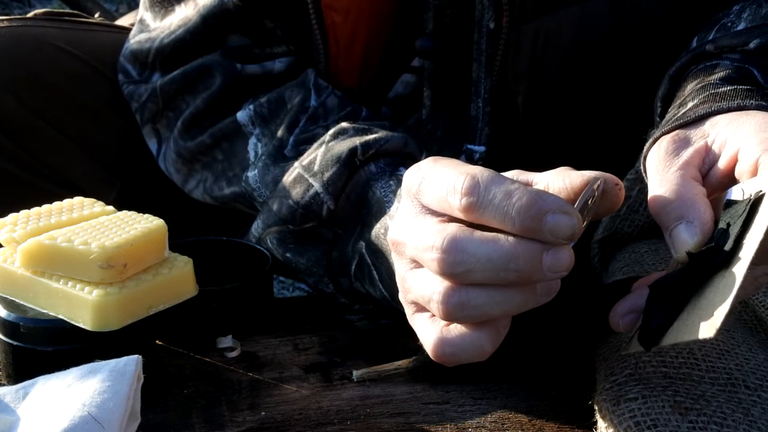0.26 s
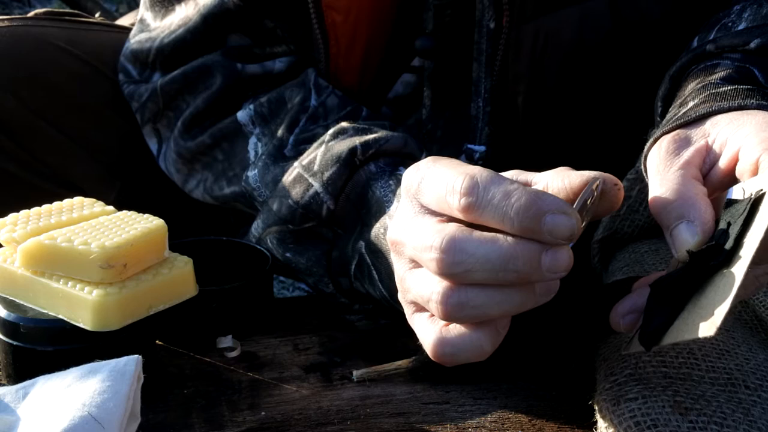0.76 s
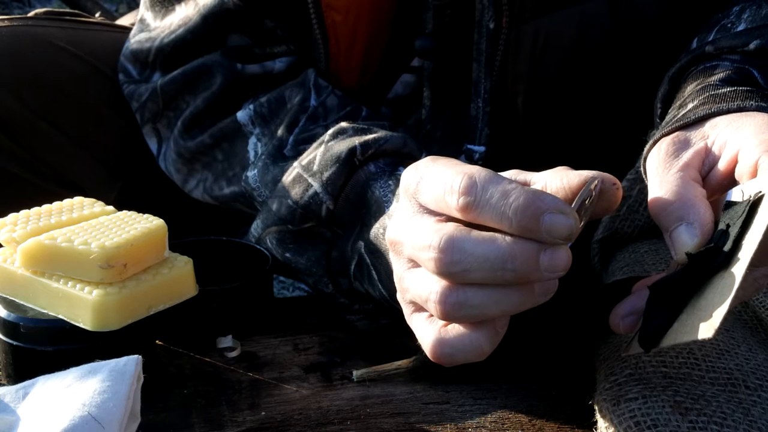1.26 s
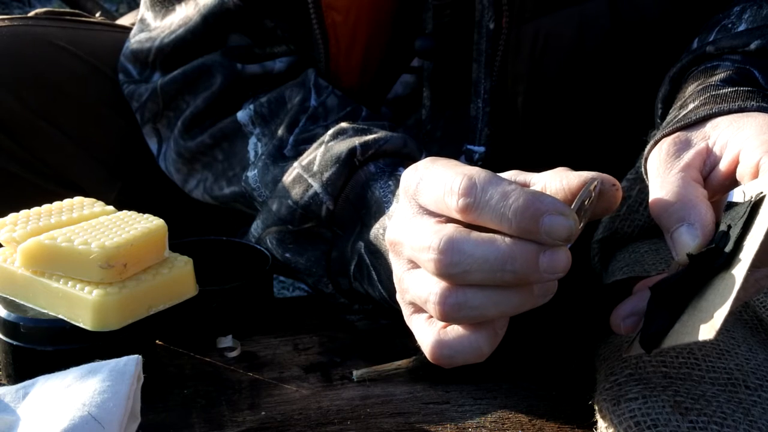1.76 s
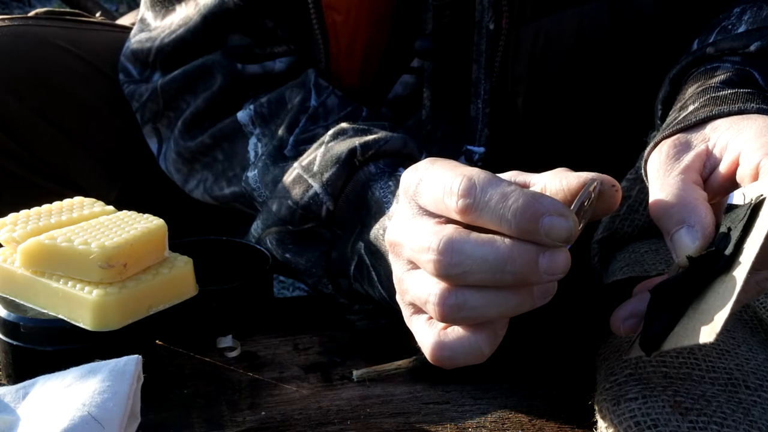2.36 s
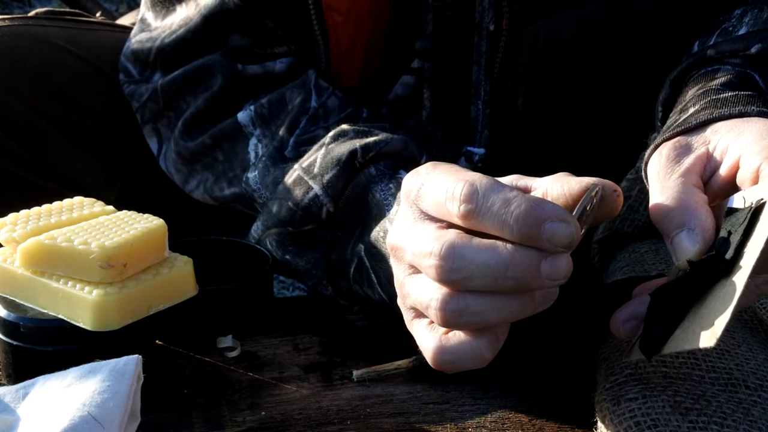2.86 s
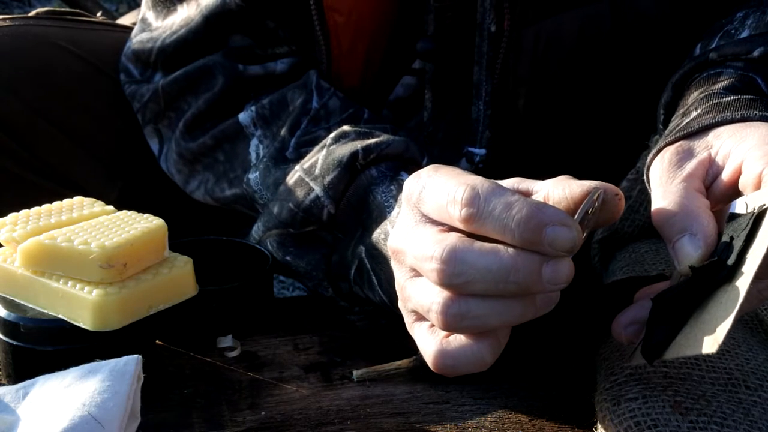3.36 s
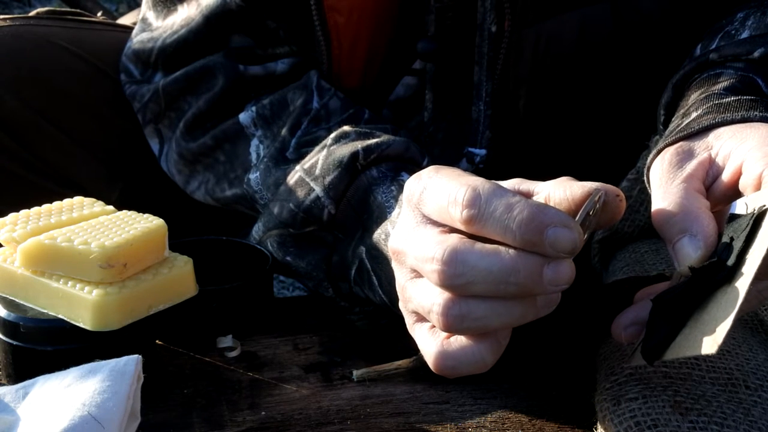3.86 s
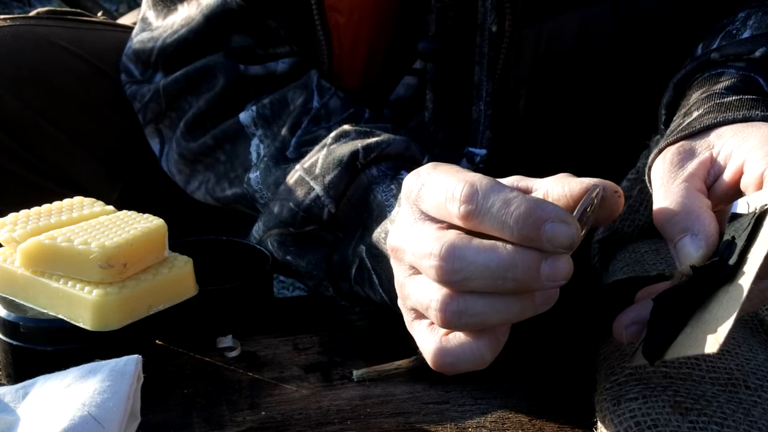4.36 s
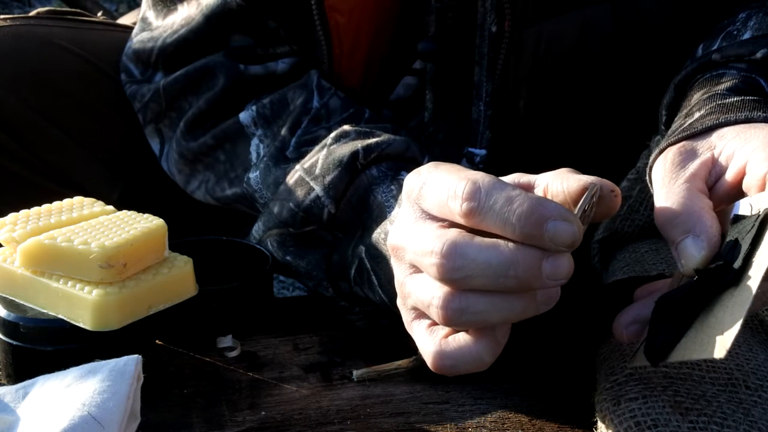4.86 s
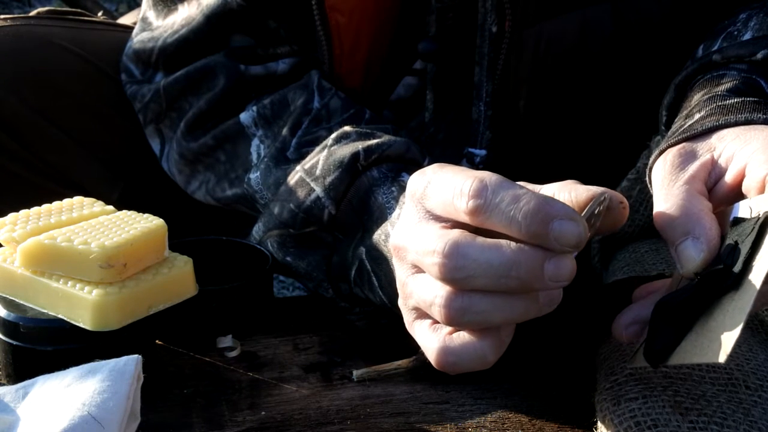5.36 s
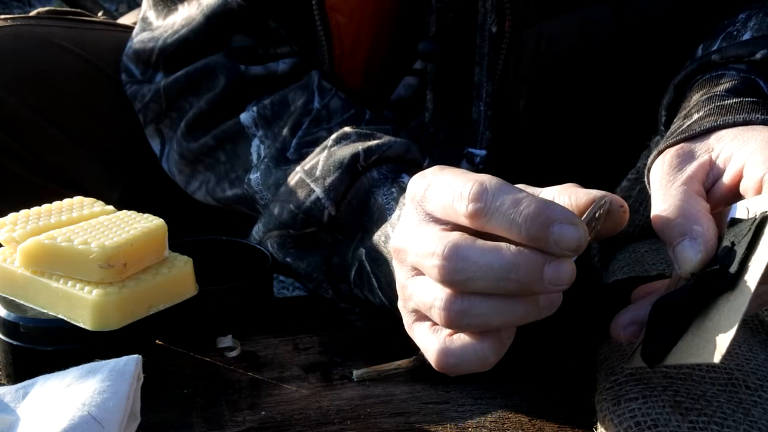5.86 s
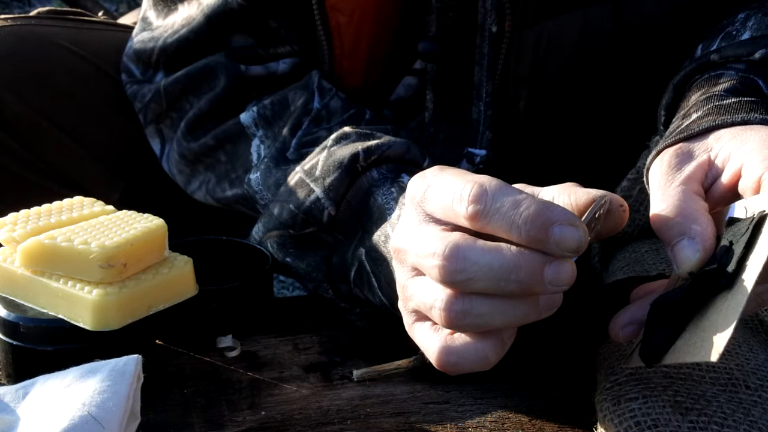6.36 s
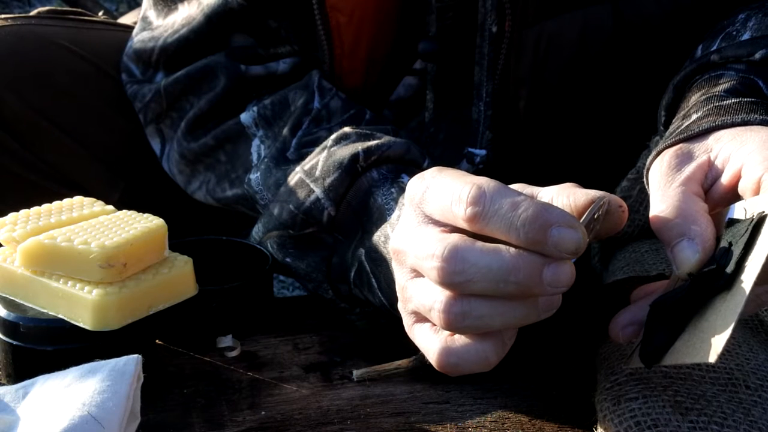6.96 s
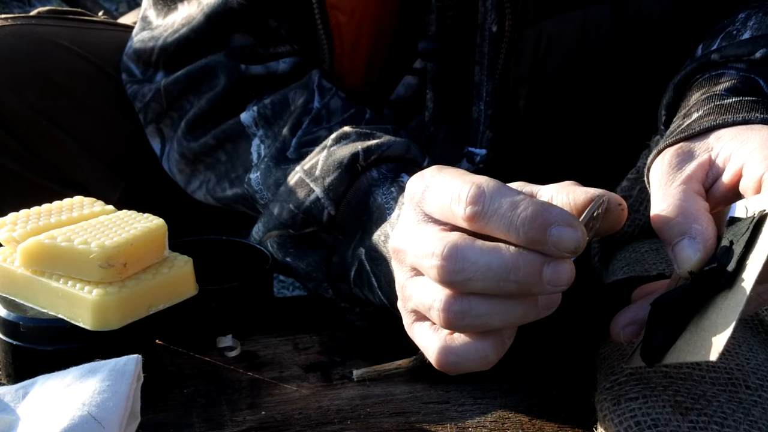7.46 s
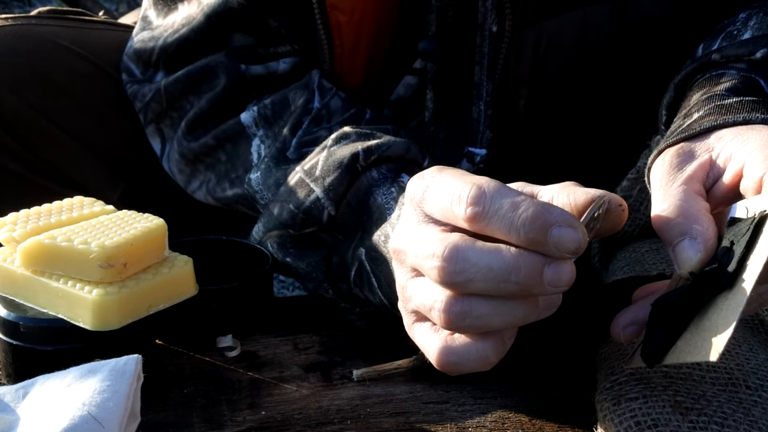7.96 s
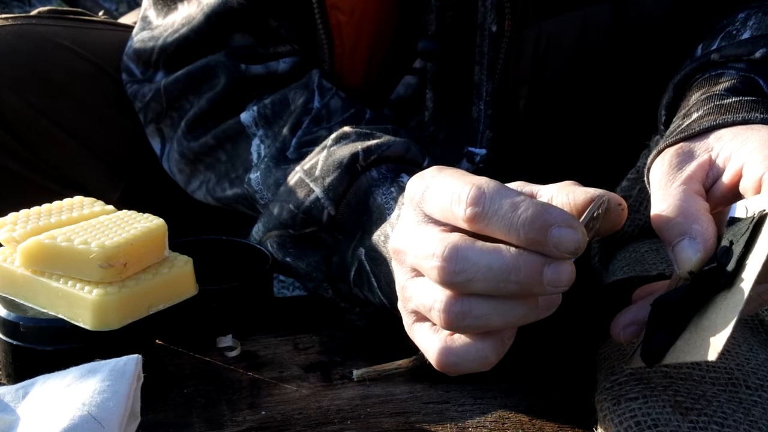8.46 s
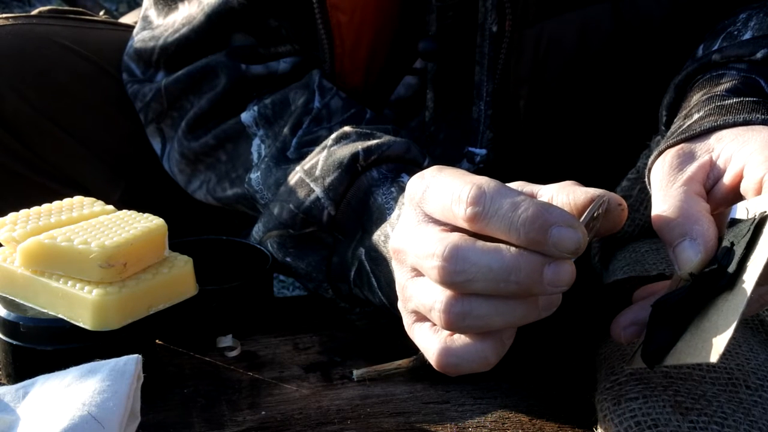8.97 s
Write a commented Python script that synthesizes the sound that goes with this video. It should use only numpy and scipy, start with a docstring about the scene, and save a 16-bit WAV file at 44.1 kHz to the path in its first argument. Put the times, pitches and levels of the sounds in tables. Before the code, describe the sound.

Loud, irregular wood cracks and two dull pops against a soft hiss and far road drone; a bird chirps thinly near the end.

```python
"""A wood fire burns low outdoors, close to a stereo recorder, over hissing embers and the roar and hum of a far road.
From the start its filtered bursts snap as cracks and ticks, each with decaying noise scattered back around it.
The loudest clip, and a gain control that starts low ducks everything after peaks, then slowly recovers.
Faint swept-sine whistles join midway; then two damped sines give dull pops amid the traffic's swells.
Near the end a bird adds an even run of soft, falling chirps."""
import sys
import numpy as np
from scipy import signal
from scipy.fft import rfft, irfft, next_fast_len
from scipy.io import wavfile
from scipy.ndimage import uniform_filter1d

SR = 44100
rng = np.random.default_rng(int(sys.argv[2]) if len(sys.argv) > 2 else 0)


def to_wav(sig):
    """Store sig (one row per channel, or 1-D mono) as 16-bit WAV at the path in sys.argv[1].

    Samples outside -1..1 are clipped; the rate is SR.
    """
    pcm = np.clip(np.atleast_2d(sig), -1, 1) * 32767
    pcm = np.round(pcm).astype(np.int16)
    wavfile.write(sys.argv[1], SR, pcm.T)  # frames by channels


N = 406161
T = np.arange(N) / SR  # time [s]

SCATTER_DB = -5.5  # scatter setting for a crack of 0 dB and 0 dB top
SCATTER_DB_PER_DB = 0.13  # weaker cracks lie deeper in the pile, so more of them arrives scattered
SCATTER_PER_TOP_DB = 0.25  # thin splinters throw more of their sound in all directions
# Cracks of the burning wood. Each row: start in seconds [s], level of the snap in dB [dB],
# depth as knock over snap in dB [dB], top as treble tilt in dB per octave about 7 kHz [dB/octave].
WOOD_CRACKS = [(.3482, -33.5, -3, 2), (1.201, -2, -9.5, -0.5), (1.3587, -21.5, -6, 1),
               (1.5763, -41.5, -22, 4), (1.6597, -31, -13, -3), (1.7379, -5, -18, -3),
               (1.7415, -13, -15, 0), (2.547, -31, -4, -3), (2.863, -38, -20, -2), (2.8906, -9, -12, 2.5),
               (3.5412, -35.5, -7, -3), (4.024, -38, -15, -2), (4.313, -31, -25, -3), (4.5315, -42, -22, 0),
               (4.5575, -40.5, 1, -2), (5.5114, -36.5, -14, 5), (5.765, -36.5, 3, -2),
               (5.833, -2.5, -20, 3), (5.839, -18, -23, 9), (6.2027, -44, -8, -2), (6.3872, -26, -7, -6),
               (6.3894, -22, 5, -10), (6.898, -9, -1, -12.5), (7.8227, -34.5, 4, 2),
               (7.9891, -41.5, -4, -6), (8.4204, -34, -5, 4), (8.5034, -38.5, 12, -17),
               (8.5823, -32.5, 4, -2), (8.904, -29.5, -11, -8), (9.053, -44, -12, -8)]


def cracks():
    """Direct and scattered sound: a direct burst at each microphone, then a diffuse decaying tail."""
    direct, scattered = np.zeros((2, N)), np.zeros((2, N))
    short_t, echo_t = T[:SR // 40], T[:SR // 4]
    for start_s, db, depth_db, top_db in WOOD_CRACKS:
        push = fracture(short_t, tear_s=0.00046, tearing=0.89, evenness=0.27)
        scatter_db = SCATTER_DB - SCATTER_DB_PER_DB * db + SCATTER_PER_TOP_DB * top_db
        impulse = signal.unit_impulse(len(short_t))
        all_round = wood(impulse, db, depth_db, top_db) * undb(scatter_db)
        for channel in range(2):
            add(direct[channel], start_s, wood(push[channel], db, depth_db, top_db))
            echo = surroundings(echo_t, near_s=0.0028, near_db=10.0, far_t60_s=0.21, dulling_s=0.069)
            add(scattered[channel], start_s, signal.fftconvolve(all_round, echo))
    return at_microphones(direct) + scattered


def fracture(t, tear_s, tearing, evenness):
    """Impulsive excitation: one sudden break, then fibres tearing as decaying noise."""
    shared = rng.standard_normal(len(t))
    # each microphone catches the finest splinters differently; differencing favours the treble
    own = np.diff(rng.standard_normal((2, len(t) + 1)))
    fibres = (shared + 0.21 * own) * np.exp(-t / tear_s)
    push = tearing * fibres / np.linalg.norm(fibres[0])
    push[:, 0] += 1
    # evenness 0 leaves the spectrum as it is, 1 makes it flat
    spectrum = rfft(push)
    flatter = irfft(spectrum / np.abs(spectrum) ** evenness, len(t))
    return flatter * np.exp(-t / 0.006)


BODY_SHARE = 0.41  # the woody body follows this share of a crack's depth
BODY_DB = -2.0  # body over snap in a crack of no depth
# Spectra of the three parts of a crack. Each row: frequency in hertz [Hz], gain in dB [dB].
KNOCK_SPECTRUM = [(150, -14), (400, -4), (750, -3.5), (1100, 3), (1450, -3), (1900, -25), (2800, -32.5),
                  (4500, -56)]
BODY_SPECTRUM = [(700, -36.5), (1400, -33.5), (1900, -6), (2400, 2.5), (2800, -0.5), (3300, 6), (4200, -16),
                 (6000, -37)]
SNAP_SPECTRUM = [(2500, -37.5), (4600, -14), (6200, 1), (7500, 4.5), (9300, 4.5), (11000, 0.5), (12500, -4),
                 (14500, -24), (16500, -17)]


def wood(push, db, depth_db, top_db):
    """Source-filter response: wood answers a push with a knock, a hollow body and a bright snap."""
    # thick pieces are deeper, thin splinters have more top
    snap_spectrum = []
    for hz, level_db in SNAP_SPECTRUM:
        octaves = np.clip(np.log2(hz / 7000), -0.5, 1.5)
        snap_spectrum.append((hz, level_db + top_db * octaves))
    knock = burst(colour(push, KNOCK_SPECTRUM), db + depth_db)
    body = burst(colour(push, BODY_SPECTRUM), db + BODY_DB + BODY_SHARE * depth_db)
    snap = burst(colour(push, snap_spectrum), db)
    return knock + body + snap


# Colour of what the surroundings throw back. Each row: frequency in hertz [Hz], gain in dB [dB].
SCATTER_SPECTRUM = [(200, -9), (1000, -4.5), (2300, -1.5), (3200, -4.5), (4500, 8), (6200, -4), (8000, -5),
                    (11000, 1.5), (15000, 11)]


def surroundings(t, near_s, near_db, far_t60_s, dulling_s):
    """Diffuse reflection and air absorption: clutter from logs and ground, then ever duller returns."""
    near = undb(near_db) * np.exp(-t / near_s)
    far = np.exp(-np.log(1000) * t / far_t60_s)
    # returns come in uneven clumps
    grain_db = 1.3 * rng.standard_normal(len(t))
    clump_db = 4.5 * np.repeat(rng.standard_normal(len(t)), SR // 600)[:len(t)]
    returns = rng.standard_normal(len(t)) * undb(grain_db + clump_db)
    dull = signal.sosfilt(signal.butter(2, 11000, fs=SR, output="sos"), returns)
    # the roll keeps bright and dull returns independent while one fades into the other
    fresh = np.exp(-t / dulling_s)
    bright = np.roll(returns, len(t) // 2)
    blend = np.sqrt(fresh) * bright + np.sqrt(1 - fresh) * dull
    echo = blend * (near + far) * np.minimum(t / 0.00028, 1)
    return colour(echo / np.linalg.norm(echo), SCATTER_SPECTRUM)


MICROPHONE_LAG_S = 0.00003  # direct crack sound reaches the right microphone this much later


def at_microphones(pair):
    """Interaural-style time difference: a linear phase shift delays the right channel."""
    size = pair.shape[1]
    lag = np.exp(-2j * np.pi * np.fft.rfftfreq(size, 1 / SR) * MICROPHONE_LAG_S)
    return np.array([pair[0], irfft(rfft(pair[1]) * lag, size)])


# Dull pops of gas. Each row: start in seconds [s], level in dB [dB], ring in hertz [Hz],
# decay time in seconds [s].
GAS_POPS = [(6.3906, -12, 203, 0.0018), (6.8982, -20, 260, .002)]


def pops():
    """Damped oscillation: a pocket of gas lets go with one heavily damped low swing."""
    out, t = np.zeros((2, N)), T[:SR // 16]
    for start_s, db, hz, decay_s in GAS_POPS:
        swing = np.sin(2 * np.pi * hz * t) * np.exp(-t / decay_s)
        add(out, start_s, burst(swing, db))
    return out


# Spectrum of the glowing wood. Each row: frequency in hertz [Hz], density in dB per hertz [dB/Hz].
HISS_SPECTRUM = [(500, -3), (2000, 5.5), (3300, 0.5), (4500, 0), (6500, -2), (8500, -4), (11000, -7.5),
                 (13500, -12.5), (16000, -20)]


def embers(hiss_db, flicker_db, ticks_per_s, tick_db):
    """Broadband noise and a random impulse train: a soft flickering hiss with tiny ticks."""
    hiss = air(HISS_SPECTRUM, apart=1.0) * undb(hiss_db + flicker_db * walk(9.2))
    struck = rng.random(N) < ticks_per_s / SR
    ticks = struck * undb(tick_db + rng.uniform(-11, 0, N))
    return hiss + colour(ticks, SNAP_SPECTRUM)


ROAR_RISE_DB_PER_S = 0.13  # the traffic slowly grows
PASS_DRONE_DB, PASS_WHINE_DB, WHINE_WANDER_HZ = -41, -46.5, 8  # levels for a vehicle at 0 dB
ENGINE_HZ, ENGINE_WANDER_HZ = 111, 3.645
# Steady road spectra. Each row: frequency in hertz [Hz], density in dB per hertz [dB/Hz].
TYRE_SPECTRUM = [(250, -20), (450, -9), (620, -2.5), (780, 1.5), (1000, 1), (1200, -6.5), (1500, -15),
                 (2000, -21.5), (2600, -32.5), (3500, -39), (6000, -92)]
DRONE_SPECTRUM = [(200, -5.5), (340, -4.5), (430, 4), (520, 9.5), (650, 6.5), (850, -4.5), (1400, -43)]
RUMBLE_SPECTRUM = [(20, -36), (32, -28), (45, -14), (60, 0.5), (80, 0), (130, -2.5), (170, 0.5),
                   (240, -3.5), (330, -13), (480, -18), (900, -64)]
# Vehicles passing far off. Each row: nearest time in seconds [s], spread of the swell in seconds [s],
# relative level in dB [dB], pitch of the tyre whine in hertz [Hz].
VEHICLE_PASSES = [(5.7, 1, -8, 427.2), (6.96, 0.44, 0.5, 520), (8.9, 0.96, -0.5, 528.5)]
# Hum of a far engine. Each row: time in seconds [s], level in dB [dB].
ENGINE_LEVELS = [(1.2, -40.5), (1.7, -45.5), (5.5, -50), (6, -40.5), (7.4, -41.5), (8, -43.5)]


def road(tyres_db, drone_db, rumble_db, waver_db):
    """Noise and tonal sources combined: roar, rumble and hum; passing vehicles swell drone and whine."""
    rise_db = ROAR_RISE_DB_PER_S * T
    out = air(TYRE_SPECTRUM, apart=0.18) * undb(tyres_db + rise_db + waver_db * walk(8))
    out += air(RUMBLE_SPECTRUM, apart=0.085) * undb(rumble_db + rise_db + waver_db * walk(5))
    engine_db = np.interp(T, *np.transpose(ENGINE_LEVELS))
    out += tone(ENGINE_HZ, ENGINE_WANDER_HZ) * undb(engine_db)
    drone = air(DRONE_SPECTRUM, apart=0.078) * undb(waver_db * walk(6))
    drone_gain = undb(drone_db)
    for nearest_s, spread_s, db, whine_hz in VEHICLE_PASSES:
        near = undb(db) * np.exp(-0.5 * ((T - nearest_s) / spread_s) ** 2)
        # independent noises add in power
        drone_gain = np.hypot(drone_gain, near * undb(PASS_DRONE_DB))
        out += tone(whine_hz, WHINE_WANDER_HZ) * near * undb(PASS_WHINE_DB)
    return out + drone * drone_gain


def tone(hz, wander_hz):
    """Frequency and amplitude modulation: a far sine near unit level wavers in pitch and strength."""
    phase = 2 * np.pi * np.cumsum(hz + wander_hz * walk(16)) / SR
    return np.sqrt(2) * np.sin(phase) * undb(1.5 * walk(7))


# Thin bird whistles. Each row: start in seconds [s], length in seconds [s], start pitch in hertz [Hz],
# end pitch in hertz [Hz], level in dB before flutter and echo [dB].
BIRD_WHISTLES = [(5.28, .17, 7800, 6740, -63), (5.586, .052, 5600, 4350, -60),
                 (5.955, .12, 5680, 5400, -55), (6.225, .12, 7400, 7350, -62),
                 (6.446, 0.051, 4120, 4200, -55), (8.228, .11, 4600, 4550, -63)]


def bird(waver, flutter_db, direct, echo_s):
    """Frequency glides in a diffuse field: thin, fluttering whistles smeared by their echo."""
    song = np.zeros(N)
    wobble = 1 + waver * walk(300)
    for start_s, length_s, start_hz, end_hz, db in BIRD_WHISTLES + twitter(count=4):
        u = np.linspace(0, 1, int(length_s * SR))
        note_wobble = np.roll(wobble, -int(start_s * SR))[:len(u)]
        hz = (start_hz + (end_hz - start_hz) * u) * note_wobble
        sine = np.sqrt(2) * np.sin(2 * np.pi * np.cumsum(hz) / SR)
        add(song, start_s, undb(db) * np.sin(np.pi * u) * sine)
    song *= undb(flutter_db * walk(70))
    t = T[:SR // 3]
    echo = rng.standard_normal((2, len(t))) * np.exp(-t / echo_s)
    echoed = signal.fftconvolve(song[None], echo / np.linalg.norm(echo))[:, :N]
    return direct * song + echoed


TWITTER_START_S, TWITTER_EVERY_S, CHIRP_S = 8.46, 0.15, 0.093
CHIRP_HZ, CHIRP_SPREAD_OCTAVES, CHIRP_FALL_HZ, CHIRP_DB = 3660, 0.047, 200, -60


def twitter(count):
    """Periodic repetition: evenly timed falling chirps, each at its own pitch, as whistle rows."""
    pitches = CHIRP_HZ * 2 ** (CHIRP_SPREAD_OCTAVES * rng.standard_normal(count))
    notes = []
    for k, hz in enumerate(pitches):
        start_s = TWITTER_START_S + k * TWITTER_EVERY_S
        notes.append((start_s, CHIRP_S, hz, hz - CHIRP_FALL_HZ, CHIRP_DB))
    return notes


def undb(db):
    """Logarithmic level: decibels to an amplitude gain."""
    return 10 ** (np.asarray(db) / 20)


def gains(points, size):
    """Spectral envelope: levels joined over log frequency, as gains on transform bins."""
    hz, db = np.transpose(points)
    bins_hz = np.fft.rfftfreq(size, 1 / SR)
    return undb(np.interp(np.log(bins_hz + 1), np.log(hz), db))


def colour(x, points):
    """Minimum-phase filtering: a causal response with the given spectrum rings only after a blow."""
    size = 2 * next_fast_len(len(x))
    # folding the cepstrum onto positive times makes the filter causal
    cepstrum = irfft(np.log(gains(points, size)))
    cepstrum[1:size // 2] *= 2
    cepstrum[size // 2 + 1:] = 0
    response = np.exp(rfft(cepstrum))
    return irfft(rfft(x, size) * response)[:len(x)]


def walk(rate):
    """Smoothed random modulation: levels held for 1 / rate seconds, slewed twice; spread near 1."""
    k = int(SR / rate)
    held = np.repeat(rng.standard_normal(N // k + 1), k)
    return 1.3 * uniform_filter1d(uniform_filter1d(held, k), k)[:N]


def air(points, apart):
    """Mid-side decorrelation: stereo noise of unit level; apart weights the left-right difference."""
    size = next_fast_len(N, real=True)
    spectra = rfft(rng.standard_normal((2, size))) * gains(points, size)
    mid, side = irfft(spectra, size)[:, :N]
    pair = np.array([mid + apart * side, mid - apart * side])
    return pair / pair.std()


def burst(x, db):
    """Energy-equivalent level: a short sound's energy, packed into one millisecond, has this level."""
    return x * undb(db) / np.sqrt(np.sum(x ** 2) / (SR / 1000))


def add(out, s, sound):
    """Superposition: mix a sound in at a time in seconds."""
    i = int(s * SR)
    out[..., i:i + sound.shape[-1]] += sound[..., :max(N - i, 0)]


def scene():
    """Superposition of sources: fire in front, road and bird behind."""
    fire = cracks() + pops() + embers(hiss_db=-54.5, flicker_db=0.3, ticks_per_s=4, tick_db=-31.5)
    far_road = road(tyres_db=-36.0, drone_db=-47.5, rumble_db=-39.0, waver_db=0.38)
    return fire + far_road + bird(waver=0.02, flutter_db=2.0, direct=0.64, echo_s=0.08)


def gain_control(x, limit_db, recover_db_per_s, start_db, attack_s):
    """Dynamic range limiting: peaks over the limit quickly cut the gain, which recovers steadily."""
    power = uniform_filter1d(np.mean(x ** 2, axis=0), SR // 1000)
    over_db = np.maximum(10 * np.log10(np.maximum(power, 1e-12)) - limit_db, 0)
    over_db[0] = start_db  # the gain starts low
    recovered_db = recover_db_per_s * T
    cut_db = np.maximum.accumulate(over_db + recovered_db) - recovered_db
    # one-pole smoothing gives the attack
    keep = np.exp(-1 / (attack_s * SR))
    smooth_cut_db = signal.lfilter([1 - keep], [1, -keep], cut_db, zi=[start_db * keep])[0]
    return x * undb(-smooth_cut_db)


TOP_HZ = 15900
# Extra sensitivity of the right microphone. Each row: frequency in hertz [Hz], gain in dB [dB].
RIGHT_MICROPHONE = [(100, 0), (800, 0), (1400, 2.5), (2600, 3.5), (4500, 0), (8000, 2), (14000, -1)]


def record(dry):
    """Band limiting and clipping: unequal microphones, low cut, gain control, overload and a cut top."""
    heard = np.array([dry[0], colour(dry[1], RIGHT_MICROPHONE)])
    heard = signal.sosfilt(signal.butter(2, 30, "high", fs=SR, output="sos"), heard)
    held = gain_control(heard, limit_db=-7.5, recover_db_per_s=13.0, start_db=6.0, attack_s=0.00089)
    overloaded = np.clip(held, -1, 1)
    return signal.sosfilt(signal.ellip(10, 0.2, 90, TOP_HZ, fs=SR, output="sos"), overloaded)


dry = scene()
out = record(dry)
to_wav(out)
```